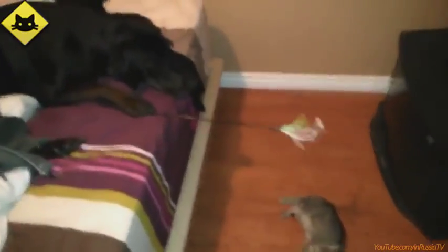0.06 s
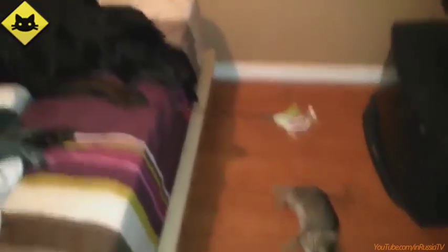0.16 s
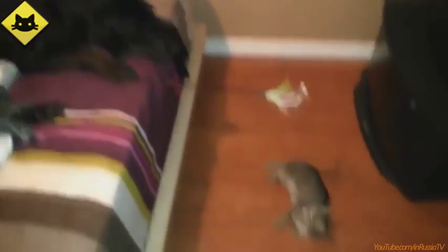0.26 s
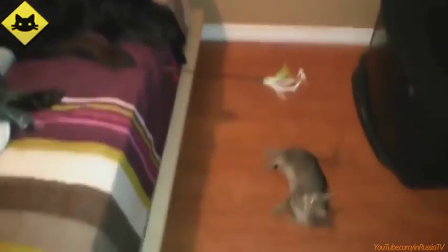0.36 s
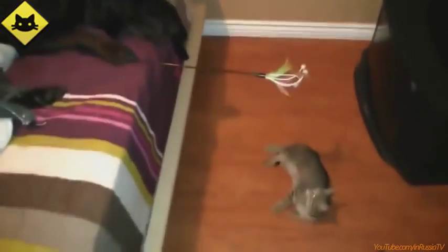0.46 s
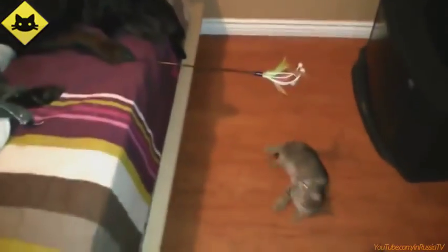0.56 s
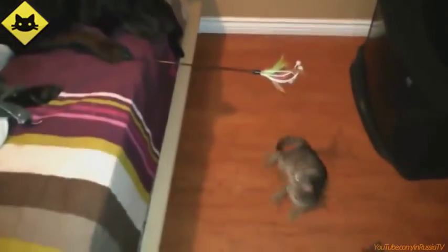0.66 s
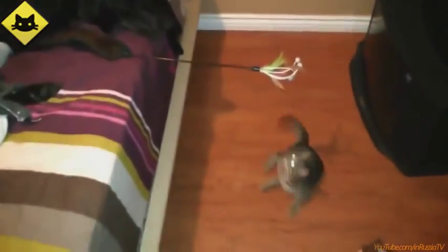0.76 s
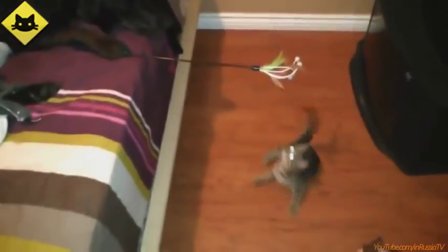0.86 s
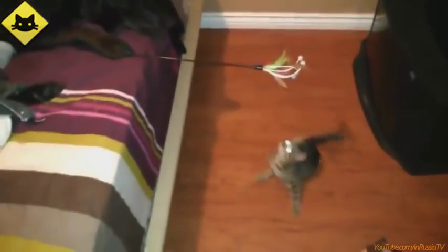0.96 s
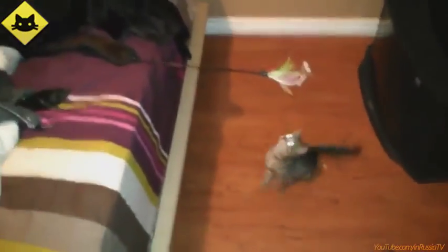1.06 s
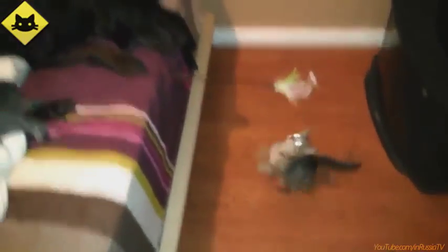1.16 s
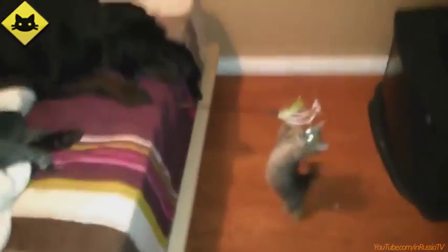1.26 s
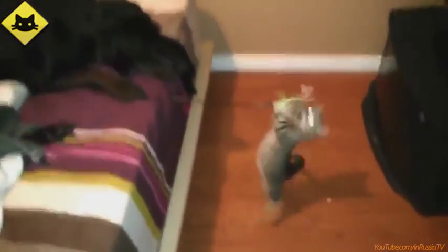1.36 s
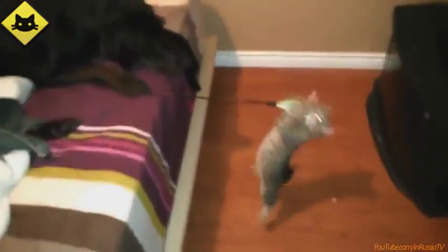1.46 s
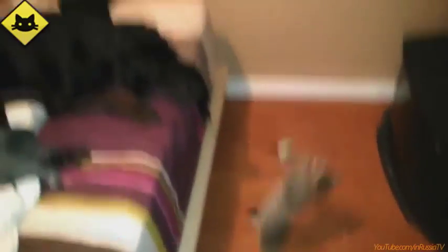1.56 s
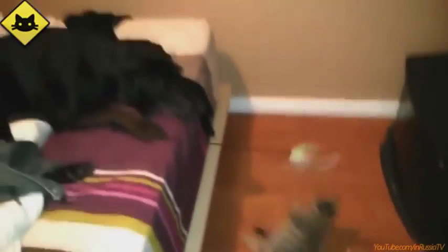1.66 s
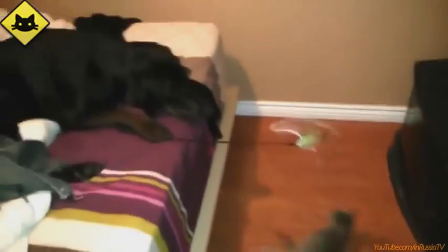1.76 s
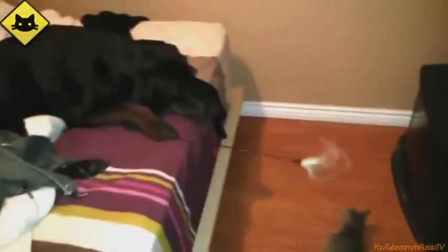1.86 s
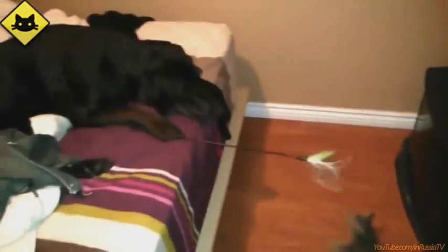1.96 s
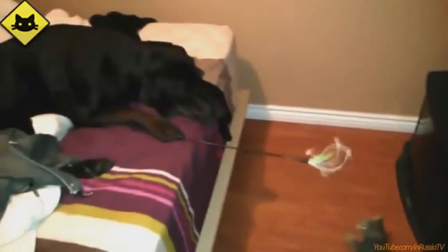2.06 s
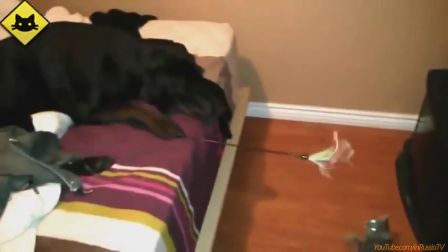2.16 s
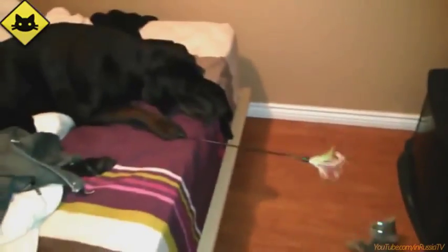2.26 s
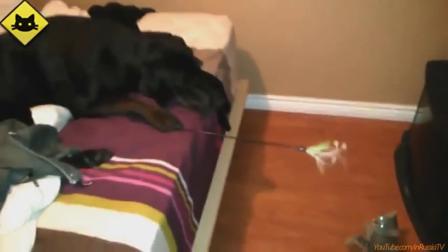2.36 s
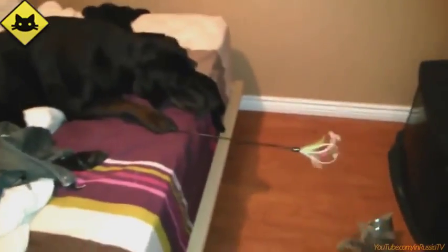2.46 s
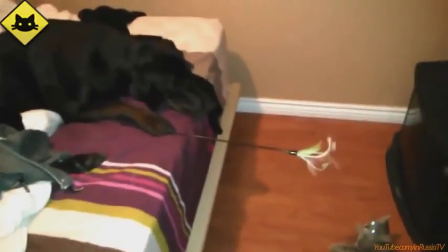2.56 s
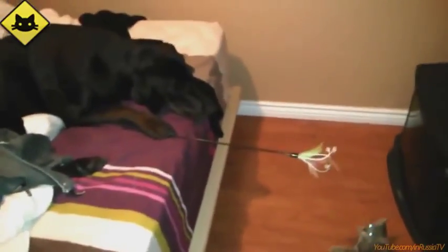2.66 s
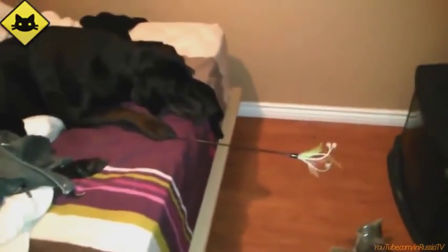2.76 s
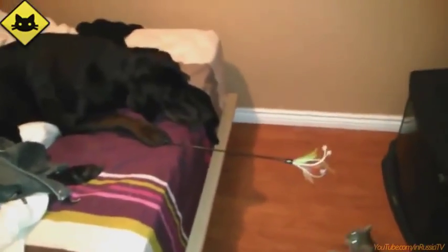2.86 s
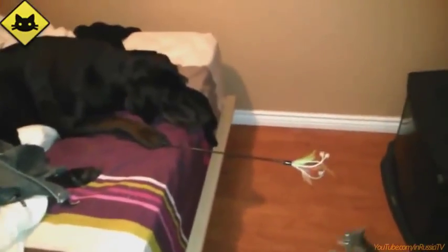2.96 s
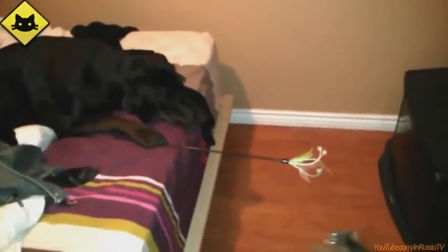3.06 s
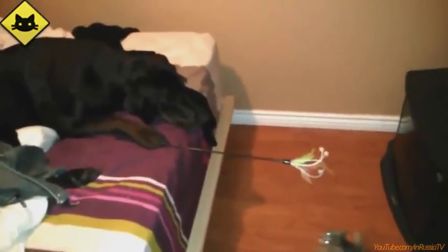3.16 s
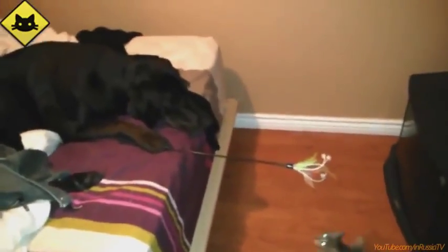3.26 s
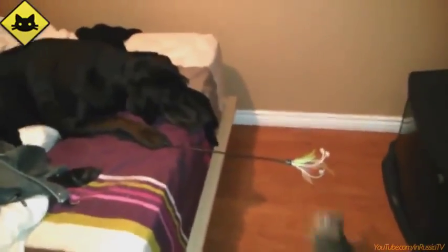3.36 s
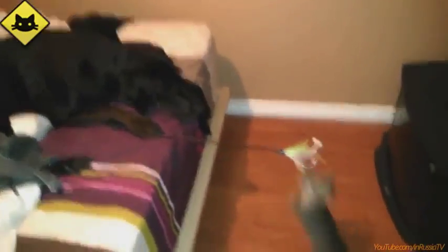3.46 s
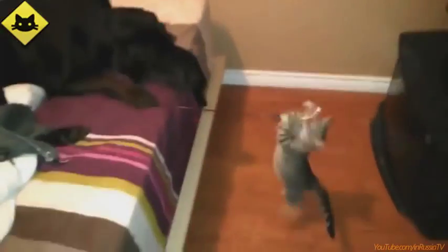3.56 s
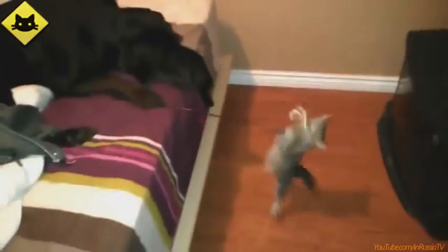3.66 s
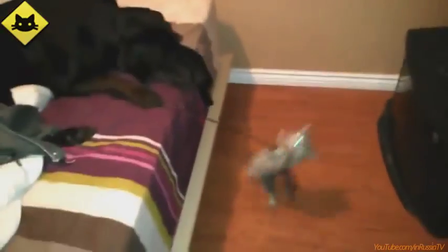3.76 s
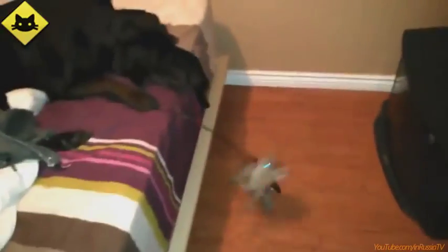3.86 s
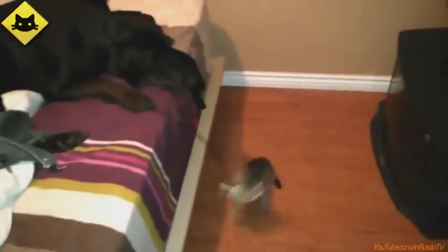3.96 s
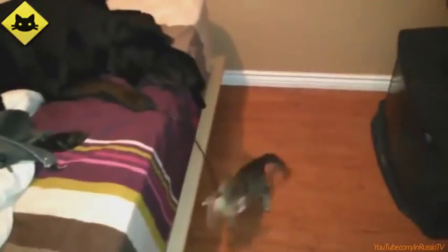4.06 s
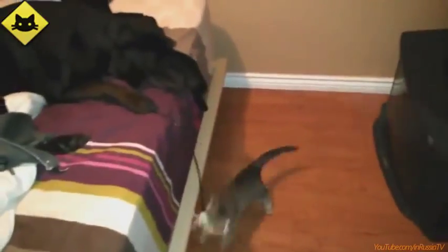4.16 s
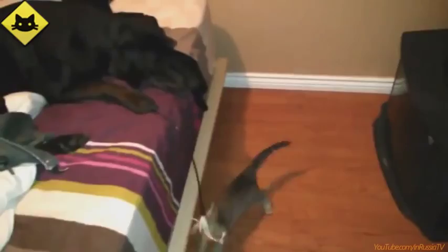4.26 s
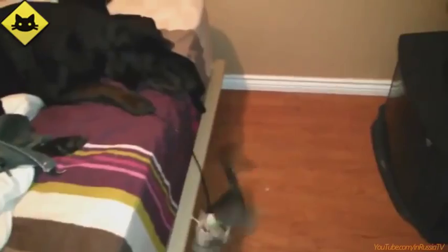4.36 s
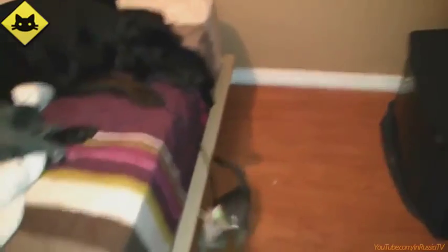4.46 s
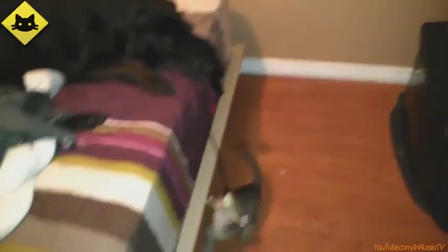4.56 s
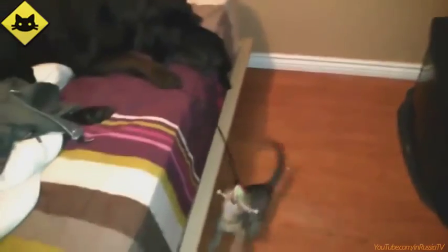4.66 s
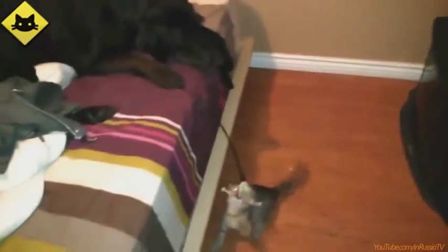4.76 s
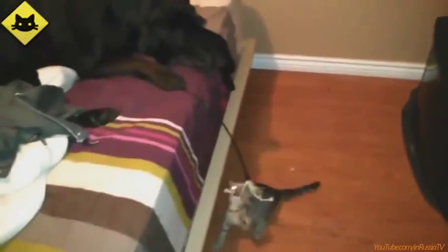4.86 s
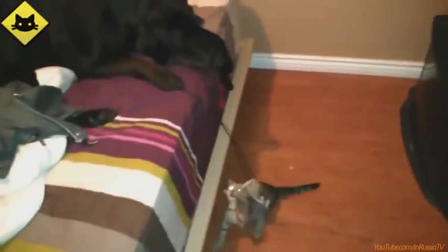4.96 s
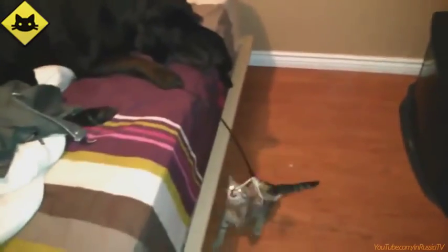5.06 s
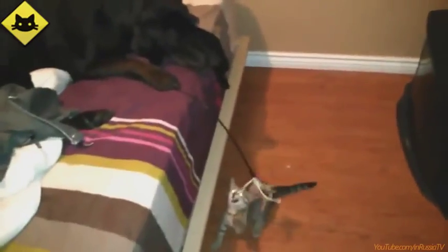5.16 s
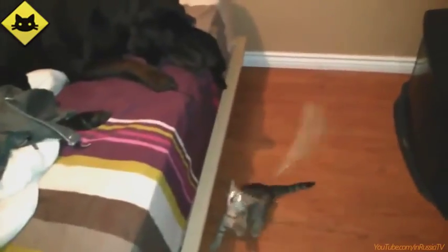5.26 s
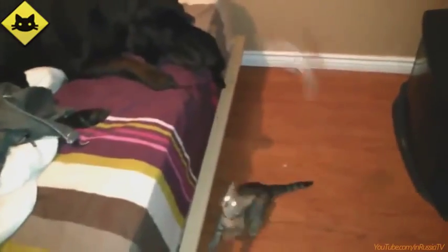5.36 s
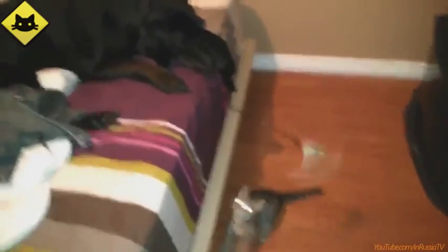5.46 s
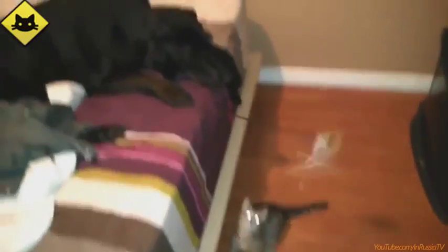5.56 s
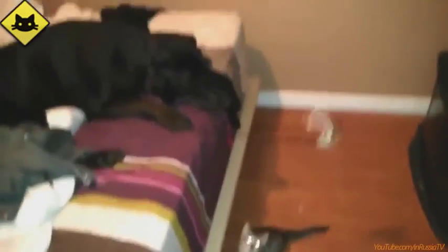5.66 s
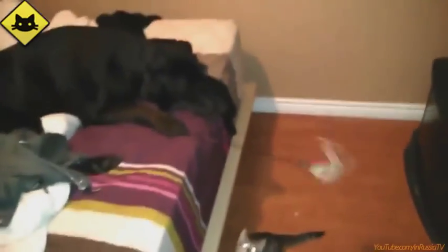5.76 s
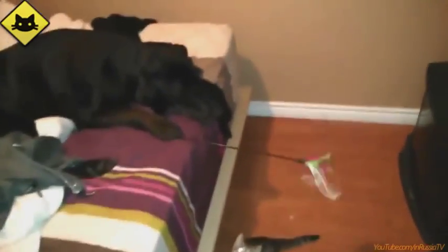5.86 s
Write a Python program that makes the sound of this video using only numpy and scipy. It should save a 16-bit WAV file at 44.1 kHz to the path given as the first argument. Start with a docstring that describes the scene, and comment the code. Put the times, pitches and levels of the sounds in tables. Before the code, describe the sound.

A small bedroom with a short room echo, heard through a handheld microphone with faint hiss, very thin high whine and low handling rumble. Small ticks and a soft plastic rustle open it, with a light slap at 0.2 s. Near 1.6 s strands swish; from 1.85 to 2.3 s a kitten lands: quick dull paw thuds ringing the boards, short claw skids, crisp plastic slaps, and the loudest dry knock and snap at 1.95 s. A softer step follows at 2.5 s, then near quiet. From about 3.4 to 5.5 s the hiss dulls and the whine vanishes. Faint swishes from 3.7 s lead to hollow, light paw taps near 4.1 s, strand slaps at 4.2 s and a stronger slap with a paw thump at 4.6 s. A dry case knock comes at 5.2 s, a sharp flick at 5.5 s as the treble returns, and a rattly bump at 5.8 s.

```python
"""In a small bedroom, a kitten leaps at a tassel toy on a wand and lands on a laminate floor.
Paws ring the board modes over dull thuds; claws skid and ring only the higher modes.
Plastic strands slap, shiver and slide as grains of coloured noise, and the room answers briefly.
The hand-held camera adds dry knocks and ticks of its case, handling rumble, hiss and a thin whine;
for about two seconds the whine and the treble of the hiss drop."""
import sys
import numpy as np
from scipy import signal
from scipy.io import wavfile
from scipy.ndimage import uniform_filter1d

SR = 44100
rng = np.random.default_rng(int(sys.argv[2]) if len(sys.argv) > 2 else 0)


def bounce(signal):
    """Save signal as a 16-bit WAV file at the path given by the first command-line argument."""
    frames = np.transpose(np.atleast_2d(signal))
    limited = np.clip(frames, -1, 1)
    pcm = np.round(limited * 32767).astype(np.int16)
    wavfile.write(sys.argv[1], SR, pcm)


N = 260631  # length in samples

# Ringing modes of the floor boards: mode_hz, strength_db (before each contact's own weighting), t60_s
FLOOR_MODES = [(123, -2, 0.16), (158, 3, 0.045), (208.4, -9.5, 0.22), (260.9, -6, 0.12),
               (319.4, -7.5, 0.15), (448, -10, 0.064), (511, -17, 0.044), (627, -11, 0.1),
               (750, -30.5, 0.068), (860, -24, 0.011), (1320, -5, 0.16), (1210, -4, 0.12),
               (1530, -12.5, .07), (1590, -14, 0.31), (1980, -7.5, 0.066), (2240, -8, .08)]


def amp(db):
    """Decibels to gain."""
    return 10 ** (np.asarray(db) / 20)


def unit(x):
    """Scales to rms 1."""
    return x / np.sqrt(np.mean(x ** 2) + 1e-24)


def read(points, hz):
    """Reads a curve of (hz, value) points on a log-frequency axis."""
    f, value = np.transpose(points)
    return np.interp(np.log(hz + 1), np.log(f + 1), value)


def add(mix, start_s, sound):
    """Mixes a sound in at a time; one that starts before zero is moved to zero."""
    part = mix[max(round(start_s * SR), 0):][:len(sound)]
    part += sound[:len(part)]


def colour(x, points, bright_hz=7000, bright_db=0, octaves=0.23, size=4096):
    """Filters x causally with unit energy: a spectrum with one extra resonance."""
    hz = abs(np.fft.fftfreq(size, 1 / SR))
    bump = np.exp(-0.5 * (np.log2((hz + 1) / bright_hz) / octaves) ** 2)
    log_gain = np.log(amp(read(points, hz) + bright_db * bump))
    # the Hilbert transform of the log gain gives the minimum phase
    spectrum = np.exp(np.conj(signal.hilbert(log_gain)))
    taps = np.fft.ifft(spectrum).real
    return signal.fftconvolve(x, taps / np.linalg.norm(taps))[:len(x)]


def envelope(t, rise_s, t60_s):
    """Swells smoothly to 1, then dies away by 60 dB per t60."""
    swell = np.sin(np.pi / 2 * np.minimum(t / max(rise_s, 1e-4), 1)) ** 2
    return swell * amp(-60 * np.maximum(t - rise_s, 0) / t60_s)


def grains(count, per_s, smooth):
    """Tiny snaps of uneven size over smooth friction noise."""
    snaps = rng.standard_normal(count) * (rng.random(count) < per_s / SR)
    return unit(snaps) + smooth * rng.standard_normal(count)


def motion(rows, rise_s, t60_s, rest_db):
    """Gain of a series of movements: each swells, holds for its length and dies away."""
    t = np.arange(N) / SR
    power = amp(rest_db) ** 2
    for start_s, length_s, gain_db in rows:
        swell = np.clip((t - start_s) / rise_s, 0, 1)
        fall_db = 60 * np.maximum(t - start_s - length_s, 0) / t60_s
        power = power + (swell * amp(gain_db - fall_db)) ** 2
    return np.sqrt(power)


def in_room(sound, wet_db, delay_s):
    """Adds room reflections as a noise tail that builds up, each band dying at its own speed."""
    # Decay of the bedroom: band_hz, t60_s
    room_decay = [(100, 0.25), (300, 0.34), (1000, 0.24), (4000, 0.28), (8000, 0.27), (15000, 0.082)]
    hz, t, bands = signal.stft(rng.standard_normal(len(sound)), SR, nperseg=256)
    decay = amp(-60 * t / read(room_decay, hz)[:, None])
    tail = signal.istft(bands * decay, SR, nperseg=256)[1]
    tail *= np.minimum(np.arange(len(tail)) / SR / delay_s, 1) ** 2
    wet = signal.fftconvolve(sound, tail)[:len(sound)]
    return sound + amp(wet_db) * unit(wet) * np.std(sound)


def footfalls():
    """Every paw contact as (start_s, level_db, pitch_hz, spread): one for a step, two for a landing."""
    # Single paws: start_s, level_db, pitch_hz (strongest), spread_octaves (narrow soft pad, wide hard blow)
    steps = [(0.951, -64, 174, 0.5), (1.295, -49, 195, 0.37), (1.946, -32, 182, 0.71),
             (1.995, -36.5, 235, 0.58), (2.063, -31.5, 208, 0.72), (2.106, -38.5, 185, 0.43),
             (2.203, -36, 155, 0.71), (3.395, -51, 179, 0.482), (4.03, -52.5, 144, 0.38),
             (4.796, -54, 200, 0.38), (5.115, -56.5, 156, 0.34)]
    # Landings on two paws: start_s, level_db, pitch_hz, spread_octaves (all four of the second paw, save
    # the start), first_paw_extra_db, first_paw_pitch_ratio
    landings = [(1.85, -31, 175, 0.66, -6.5, 1.03), (2.255, -33, 218.5, 1.036, -2, 1.79),
                (2.533, -43, 201.7, 0.51, -1.5, 1.27), (4.096, -45, 240.7, 0.497, 2, 0.91),
                (4.612, -37, 181.5, 0.6, -9.5, 1.22)]
    pair_gap_s = 0.018
    falls = list(steps)
    for start_s, level_db, pitch_hz, spread, first_db, ratio in landings:
        first_spread = spread * ratio ** 0.3  # a higher first paw also strikes harder
        falls.append((start_s, level_db + first_db, pitch_hz * ratio, first_spread))
        falls.append((start_s + pair_gap_s, level_db, pitch_hz, spread))
    return falls


def paws(contact_s=0.0023, dull_t60_s=0.09, dull_share=0.77):
    """Each footfall rings the boards around its own pitch, over a short dull thud."""
    # ring of the hollow floor near the bed frame: while the kitten is on it, and from elsewhere
    hollow_hz, hollow_db, solid_db = 700, 36.5, 2.5
    hollow_s, hollow_width_s = 4.12, 0.06
    out, t = np.zeros(N), np.arange(SR * 3 // 4) / SR
    hz, db, t60_s = np.transpose(FLOOR_MODES)
    for start_s, level_db, pitch_hz, spread in footfalls():
        on_hollow = np.exp(-((start_s - hollow_s) / hollow_width_s) ** 2)
        spot_db = solid_db + (hollow_db - solid_db) * on_hollow
        rise_s = contact_s / spread ** 2  # a soft pad presses slowly and wakes few modes
        strength_db = db - 20 * np.log10(1 + (np.log2(hz / pitch_hz) / spread) ** 4 / 2)
        strength_db = strength_db + spot_db * np.exp(-(np.log2(hz / hollow_hz) / 0.32) ** 2)
        # every spot of the floor is a little different
        detune = 1 + 0.022 * rng.uniform(-0.89, 1, len(hz))
        ring = np.zeros(len(t))
        for mode_hz, mode_db, life_s in zip(hz * detune, strength_db, t60_s):
            tone = np.sin(2 * np.pi * (mode_hz * t + rng.random()))
            ring += amp(mode_db) * tone * envelope(t, rise_s, life_s)
        ring /= np.linalg.norm(amp(strength_db))
        # the thud follows the mode strengths and falls away on both sides
        skirt = [(60, strength_db[0] - 10.5), *zip(hz, strength_db), (4000, strength_db[-1] - 5.0), (9000, -85)]
        thud = colour(rng.standard_normal(len(t)) * envelope(t, rise_s, dull_t60_s), skirt)
        blow = ring + dull_share * thud
        blow /= np.std(blow[:SR // 45])  # level is set by the first 22 ms
        add(out, start_s - rise_s / 2, amp(level_db) * in_room(blow, wet_db=-6, delay_s=0.0061))
    return out


def claws(low_hz=530, top_hz=2400, t60_s=0.03, scrape=0.9):
    """A claw skids briefly and rings only the higher modes of the floor."""
    # Claws striking the boards: start_s, gain_db (before the stroke's own rms), rise_s
    claw_strikes = [(1.851, -66, 0.003), (1.873, -49.5, 0.002), (1.905, -51.5, 0.036),
                    (2.058, -51.5, 0.0044), (2.256, -48, 0.0025)]
    out, t = np.zeros(N), np.arange(SR // 2) / SR
    ring = np.zeros(len(t))
    for hz, db, life_s in FLOOR_MODES:
        if hz > low_hz:
            ring += amp(db - 60 * t / life_s) * np.sin(2 * np.pi * hz * t)
    band = signal.butter(3, [low_hz, top_hz], "band", fs=SR, output="sos")
    for start_s, gain_db, rise_s in claw_strikes:
        stroke = envelope(t, rise_s, t60_s)
        skid = signal.sosfilt(band, grains(len(t), per_s=1500, smooth=0.55) * stroke)
        rung = signal.fftconvolve(skid, ring)[:len(t)]
        clack = unit(unit(rung) + scrape * unit(skid))
        add(out, start_s, amp(gain_db) * np.std(stroke) * in_room(clack, wet_db=-7.5, delay_s=0.0027))
    return out


def swishes(clump_db=0.5, clump_samples=130):
    """Whipped plastic strands slap, then shiver: fine snaps that come in clumps."""
    # Slaps: start_s, slap_db, rise_s, shiver_db, slap_resonance_hz (gains before each stroke's own rms)
    slaps = [(0.191, -56, 0.0033, -74, 5550), (1.618, -44.5, 0.008, -48.5, 11700),
             (1.72, -65, 0.091, -58, 7200), (1.848, -36, 0.0036, -42, 6600),
             (1.873, -37, 0.0013, -47.5, 5270), (1.907, -37, 0.031, -64, 4660),
             (1.948, -18, 0.00031, -44, 8275), (1.957, -33.5, 0.035, -37, 2250),
             (2.252, -43, 0.0047, -55.5, 4400), (3.664, -56, 0.001, -88, 6100),
             (3.82, -57, 0.0092, -50.5, 7400), (3.905, -53, 0.0055, -56.5, 8500),
             (4.075, -56, 0.0056, -51, 7050), (4.131, -55, 0.003, -70, 12000),
             (4.229, -37, 0.0077, -58, 6600), (4.244, -43.5, 0.0069, -50, 6540),
             (4.308, -49, 0.017, -54, 10100), (4.407, -52, 0.002, -65, 6130),
             (4.557, -52.5, 0.002, -68, 6030), (4.616, -25.5, 0.0061, -36.5, 5500),
             (5.246, -47.5, 0.017, -48, 9600), (5.255, -57.5, 0.015, -77, 3200),
             (5.496, -52, 0.002, -63.5, 5270), (5.534, -33, 0.00087, -51, 8100),
             (5.748, -55, 0.0063, -61.5, 5450)]
    # Colour of the plastic strands: band_hz, level_db (relative)
    strand_colour = [(300, -27), (1000, -26), (2300, -23.5), (3100, -20), (4000, -10.5), (4900, -3),
                     (6000, -1.5), (7200, -1.5), (9000, 2), (10500, -6), (12500, -11), (15500, -16.5)]
    slap_t60_s, shiver_t60_s, shiver_lag_s = 0.036, 0.22, 0.0089
    shiver_hz, shiver_bright_db = 8500, 2
    firm_db, firm_ring_db, ring_per_db = -33, 10, 0.6  # slaps lighter than firm ring more purely
    out, t = np.zeros(N), np.arange(SR // 2) / SR
    for start_s, slap_db, rise_s, shiver_db, slap_hz in slaps:
        ring_db = firm_ring_db + ring_per_db * (firm_db - slap_db)
        slap = slap_db, envelope(t, rise_s, slap_t60_s), slap_hz, ring_db
        shiver_stroke = envelope(t, rise_s + shiver_lag_s, shiver_t60_s)
        shiver = shiver_db, shiver_stroke, shiver_hz, shiver_bright_db
        for gain_db, stroke, bright_hz, bright_db in (slap, shiver):
            drift = unit(uniform_filter1d(rng.standard_normal(len(t)), clump_samples))
            snaps = grains(len(t), per_s=2900, smooth=0.93) * stroke * amp(clump_db * drift)
            burst = unit(colour(snaps, strand_colour, bright_hz, bright_db))
            add(out, start_s, amp(gain_db) * np.std(stroke) * in_room(burst, wet_db=-6.0, delay_s=0.0095))
    return out


def rustle():
    """The tassel slides softly over fur and floor: coloured friction grains follow its motion."""
    # Slides: start_s, length_s, gain_db (of the grains)
    slides = [(0, .13, -74.5), (.175, 0.032, -67.5), (1.2, 0.12, -77), (1.5, .3, -76.5), (2.05, 0.12, -63),
              (3.37, 0.16, -79), (3.92, 0.14, -77), (4.04, 0.016, -67.5), (4.72, 0.16, -80),
              (4.95, 0.03, -69.5), (5.06, 0.14, -78), (5.59, .31, -71)]
    # Colour of the sliding: band_hz, level_db (relative)
    slide_colour = [(300, -18), (600, -1.5), (950, -20), (1800, -10), (3100, -21), (4100, -11), (5000, -2),
                    (5900, -0.5), (7500, -6.5), (9000, -8.5), (15000, -11)]
    friction = colour(grains(N, per_s=510, smooth=1.2), slide_colour)
    return motion(slides, rise_s=0.021, t60_s=0.83, rest_db=-87) * friction


def camera_case(push_t60_s=0.15, give_s=0.002, order=6):
    """Knocks reach the microphone through the case, so they carry almost no room."""
    # Knocks: start_s, thud_peak_db, thud_hz, click_gain_db, rise_s, click_t60_s, rattle_share (0-1),
    # colour_depth (factor), tilt_db_per_octave
    knocks = [(0.064, -52, 69, -84, 0.0057, 0.02, 0.8, 0.7, 3),
              (0.192, -42, 76, -66.5, 0.0012, 0.023, 0.6, 0.64, -2.5),
              (1.9458, -14, 71, -14.5, 0.00009, 0.0067, 0, 0.36, -0.5),
              (2.15, -60, 110, -50, 0.0031, 0.024, 0.5, 0.3, -3.5),
              (3.837, -41, 80.3, -68, 0.0026, 0.014, 0.3, 0.8, -7),
              (5.167, -29, 94, -28, 0.0005, 0.024, 0.33, 0.99, 0.5),
              (5.784, -24.5, 87.6, -36, 0.0031, 0.031, 1, 0.82, 2.5)]
    # Colour of the case: band_hz, level_db (relative, before each knock's depth and tilt)
    case_colour = [(200, -9.5), (430, -22), (560, -2), (660, 2.5), (880, -25), (1220, -0.5), (1450, -10),
                   (1780, 1.5), (2500, -21.5), (3400, -26.5), (4700, -4.5), (5500, -6), (6400, 1.5),
                   (8800, -2), (15000, -23.5)]
    # Small ticks of the camera: peak_s, peak_db (before the room)
    ticks = [(0.0126, -45), (.403, -46), (2.615, -69.5)]
    tick_hz = 1780
    out, t = np.zeros(N), np.arange(SR // 3) / SR
    for start_s, thud_db, thud_hz, click_db, rise_s, click_t60_s, rattle, depth, tilt in knocks:
        # a one-sided push on a mount that passes no deep bass swings back in a falling thud
        mount = signal.butter(order, thud_hz, "high", fs=SR, output="sos")
        thud = signal.sosfilt(mount, envelope(t, rise_s + give_s, push_t60_s))
        chatter = rng.standard_normal(len(t)) * envelope(t, rise_s, click_t60_s)
        # one clean snap with the energy of the chatter
        snap = np.linalg.norm(chatter) * (np.arange(len(t)) == round(rise_s * SR))
        share = np.clip(rattle, 0, 1)
        touch = np.sqrt(1 - share) * snap + np.sqrt(share) * chatter
        top_hz = case_colour[-1][0]  # the tilt pivots here
        knock_colour = [(hz, depth * db + tilt * np.log2(hz / top_hz)) for hz, db in case_colour]
        click = in_room(colour(touch, knock_colour), wet_db=-17, delay_s=0.0062)
        add(out, start_s, amp(thud_db) * thud / abs(thud).max() + amp(click_db) * click)
    lead_s = 0.00235  # a tick swells this long before its peak
    for peak_s, peak_db in ticks:
        tick = np.sin(2 * np.pi * tick_hz * t) * envelope(t, lead_s, 0.015)
        add(out, peak_s - lead_s, amp(peak_db) * in_room(tick, wet_db=-22, delay_s=0.01))
    return out


def background(treble_hz=8500, whine_hz=15000):
    """Room tone, handling rumble, and the hiss and whine of the electronics."""
    # Colour of room tone and hiss: band_hz, level_db (relative)
    quiet_colour = [(25, -5), (60, -6), (120, -8.5), (280, -6), (420, -24.5), (600, -20.5), (900, -25),
                    (1900, -26), (2900, -33.5), (5500, -29), (7600, -29), (11000, -18.5), (14500, -13.5),
                    (15800, -16)]
    # Hand moving the camera and bedding shifting: start_s, length_s, gain_db (before the waver)
    moves = [(0, 0.36, -65), (1.8, 0.97, -63), (3.36, 0.97, -67), (4.93, 0.92, -65.5)]
    # Colour of the handling rumble: band_hz, level_db (relative)
    rumble_colour = [(20, -1), (70, 4.5), (150, 4), (300, -0.5), (500, -16.5), (900, -30.5), (2000, -34),
                     (4000, -42)]
    drop_s, drop_fade_s, return_s, return_fade_s = 3.37, 0.148, 5.5, 0.06
    t = np.arange(N) / SR
    quiet = amp(-68) * colour(rng.standard_normal(N), quiet_colour)
    high_pass = signal.butter(2, treble_hz, "high", fs=SR, output="sos")
    treble = signal.sosfiltfilt(high_pass, quiet)
    # treble and whine drop together; the treble creeps back up in dB per second before the return
    fade_out, fade_back = (t - drop_s) / drop_fade_s, (return_s - t) / return_fade_s
    dropped = np.clip(np.minimum(fade_out, fade_back), 0, 1)
    treble_db = -1.15 + dropped * (-12.5 + 4.5 * (t - drop_s))
    whine_db = -72 - 33 * dropped  # rms
    whine = np.sqrt(2) * amp(whine_db) * np.sin(2 * np.pi * whine_hz * t)
    # the grip is never quite still
    waver_db = 2 * unit(uniform_filter1d(rng.standard_normal(N), size=3500))
    handling = motion(moves, rise_s=0.049, t60_s=0.3, rest_db=-71.5) * amp(waver_db)
    rumble = handling * colour(rng.standard_normal(N), rumble_colour)
    return quiet + (amp(treble_db) - 1) * treble + whine + rumble


def scene(lowest_hz=60):
    """Everything at the one microphone; light paws carry no deep bass."""
    high_pass = signal.butter(2, lowest_hz, "high", fs=SR, output="sos")
    steps = signal.sosfilt(high_pass, paws())
    return (steps + claws() + swishes() + rustle() + camera_case() + background())[None]


def record(dry, edge_hz=15900):
    """The recorder's band limit: a steep linear-phase low-pass."""
    low_pass = signal.firwin(255, edge_hz, window=("kaiser", 8), fs=SR)
    return signal.oaconvolve(dry, low_pass[None], "same")


dry = scene()
out = record(dry)
bounce(out)
```